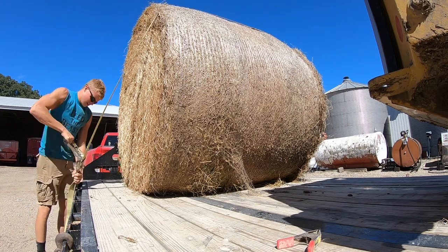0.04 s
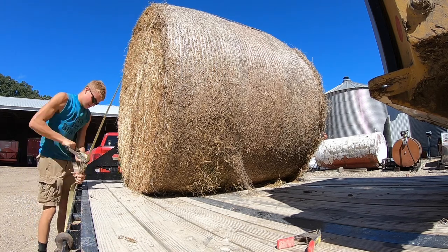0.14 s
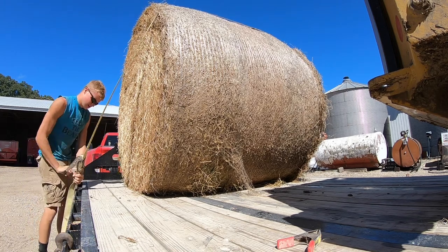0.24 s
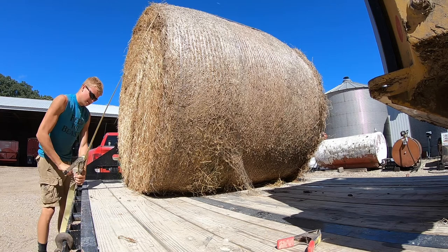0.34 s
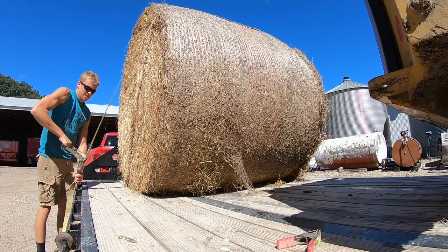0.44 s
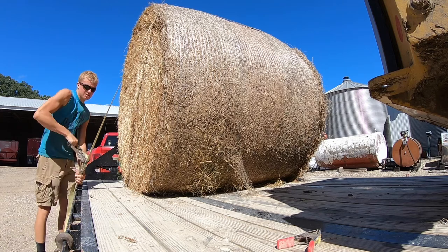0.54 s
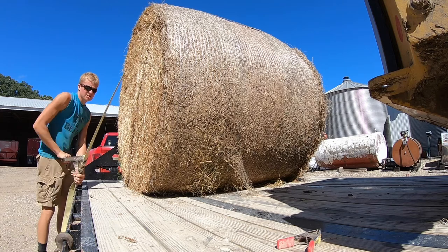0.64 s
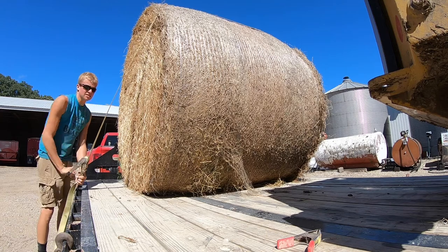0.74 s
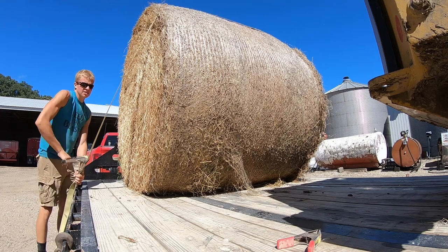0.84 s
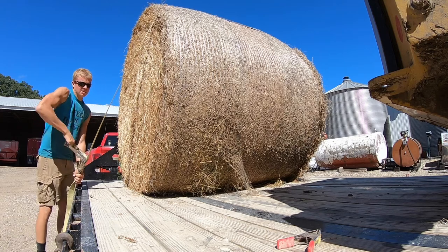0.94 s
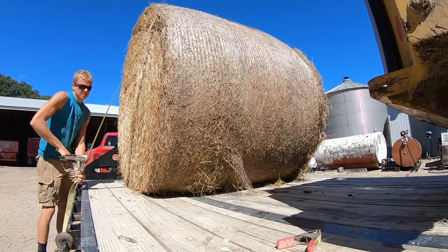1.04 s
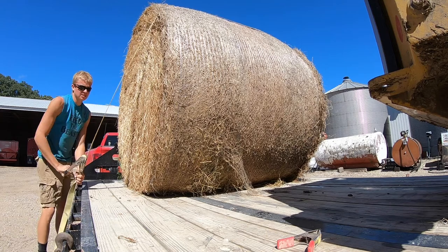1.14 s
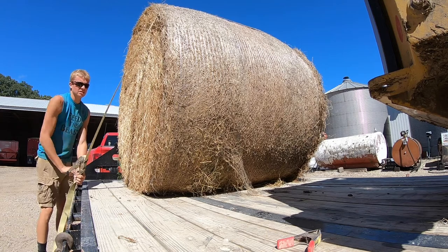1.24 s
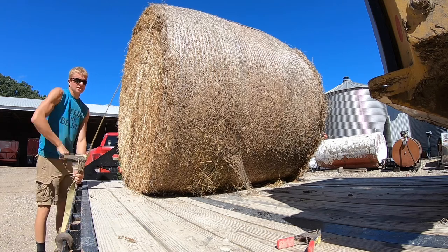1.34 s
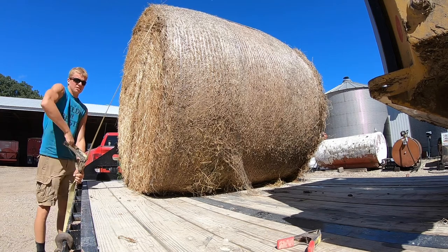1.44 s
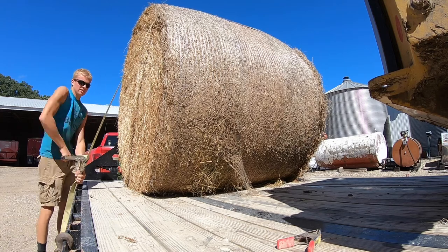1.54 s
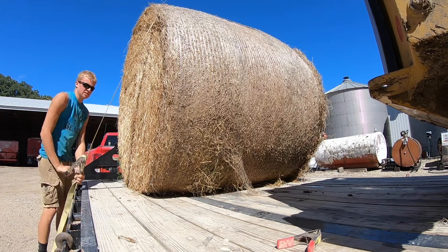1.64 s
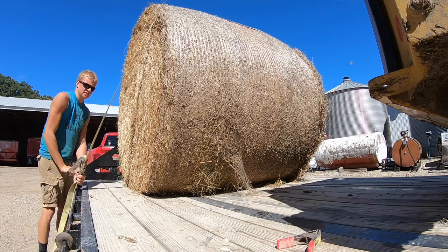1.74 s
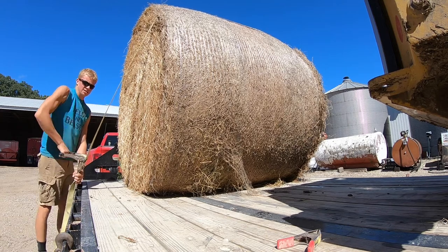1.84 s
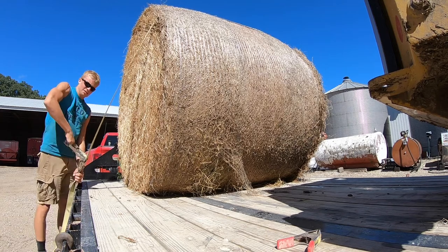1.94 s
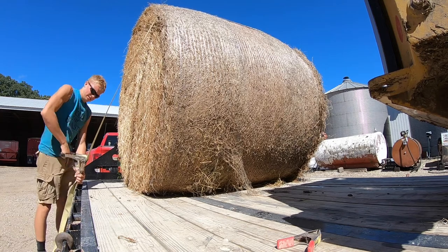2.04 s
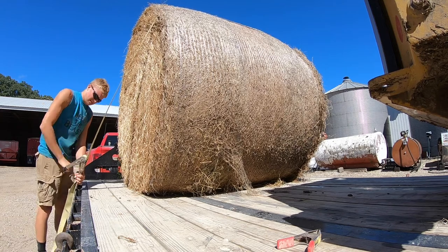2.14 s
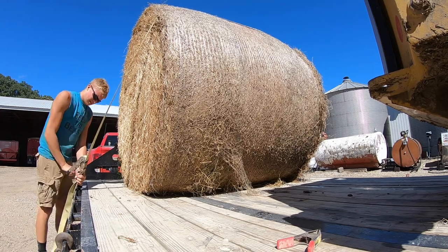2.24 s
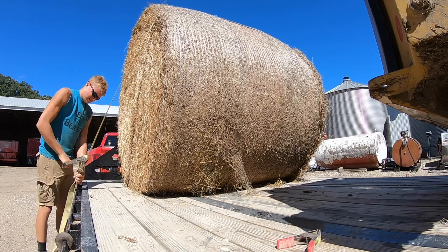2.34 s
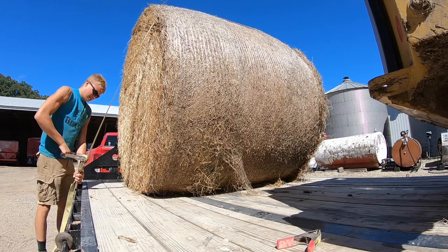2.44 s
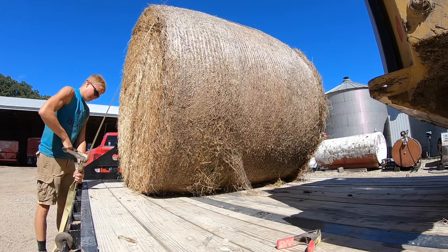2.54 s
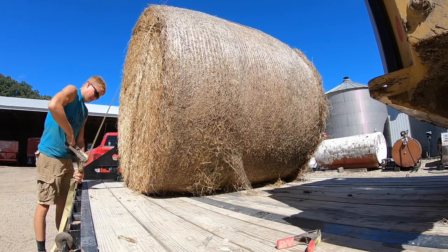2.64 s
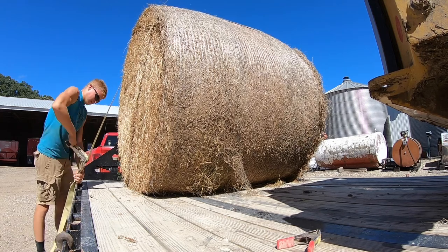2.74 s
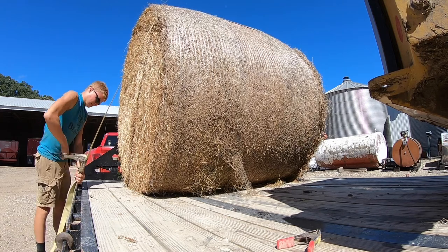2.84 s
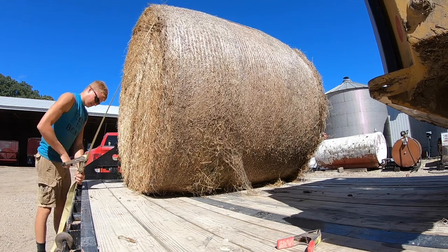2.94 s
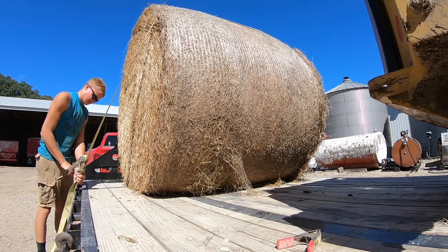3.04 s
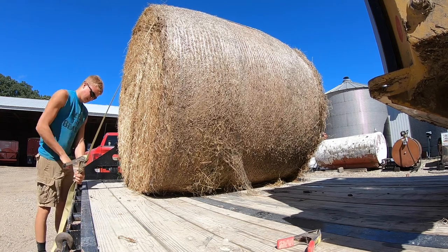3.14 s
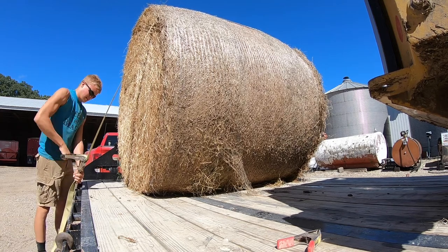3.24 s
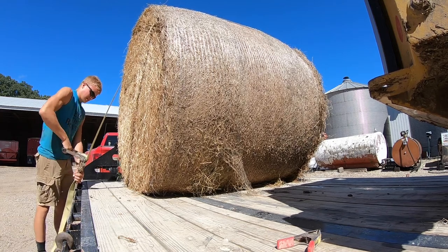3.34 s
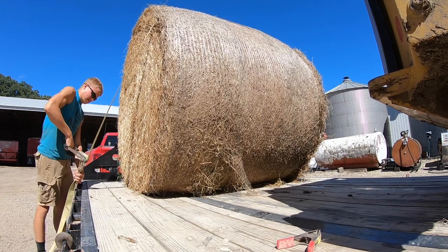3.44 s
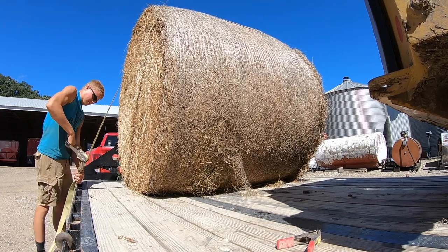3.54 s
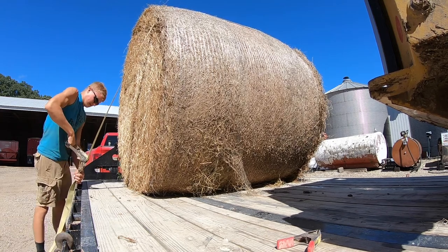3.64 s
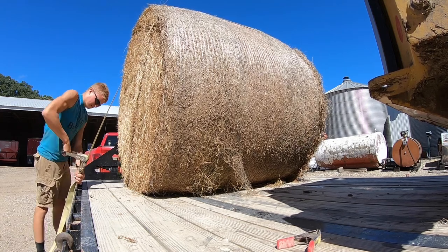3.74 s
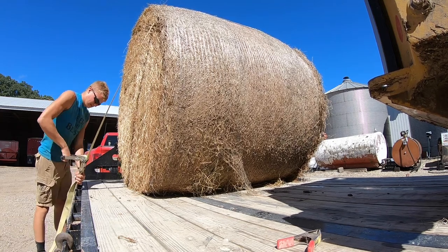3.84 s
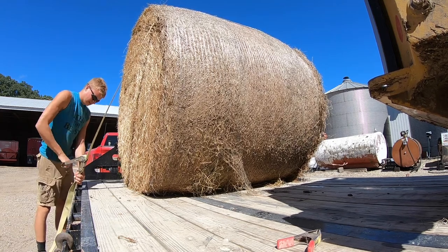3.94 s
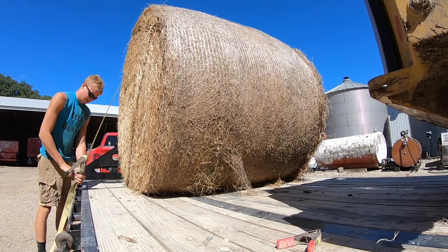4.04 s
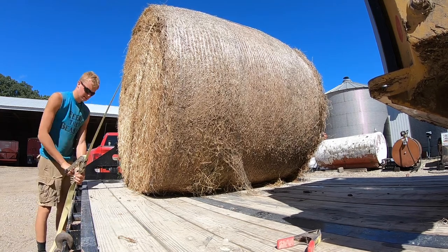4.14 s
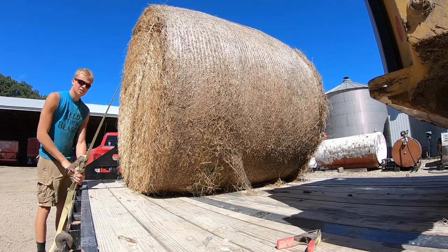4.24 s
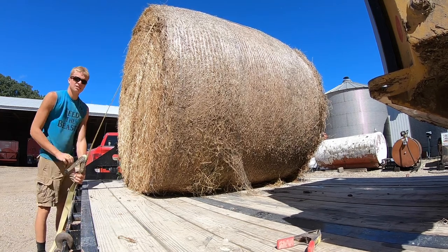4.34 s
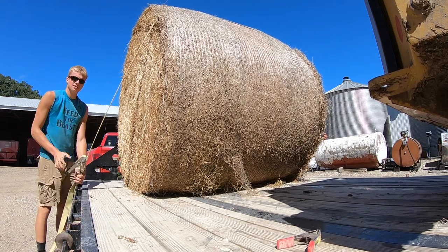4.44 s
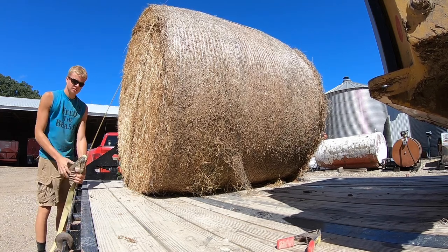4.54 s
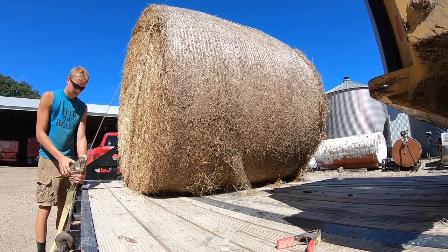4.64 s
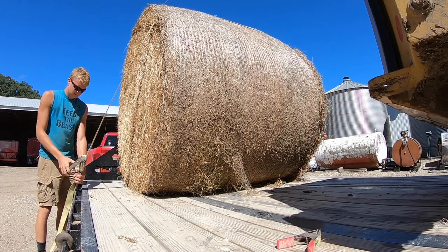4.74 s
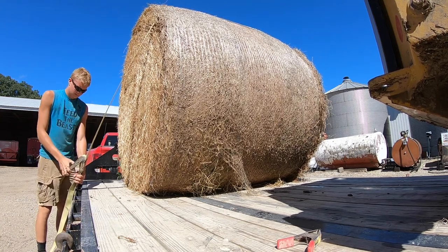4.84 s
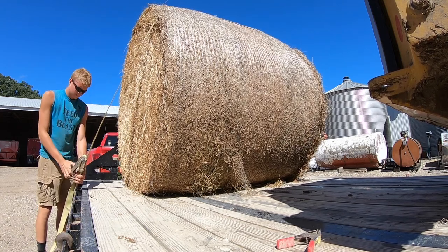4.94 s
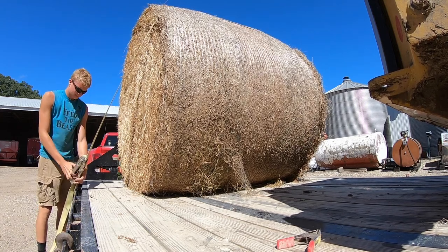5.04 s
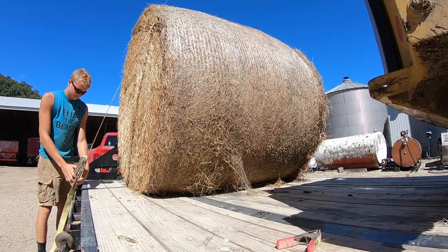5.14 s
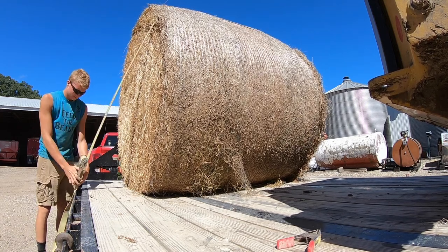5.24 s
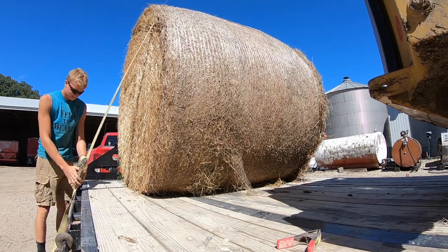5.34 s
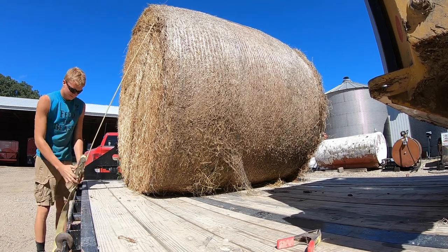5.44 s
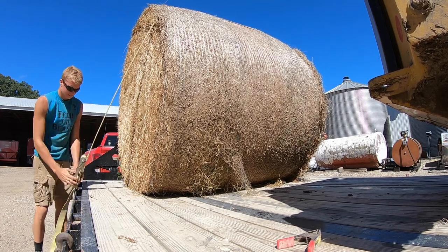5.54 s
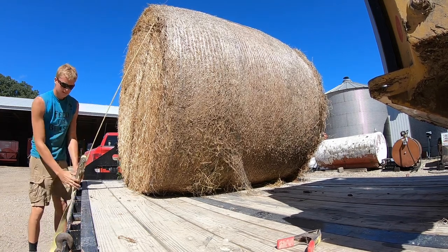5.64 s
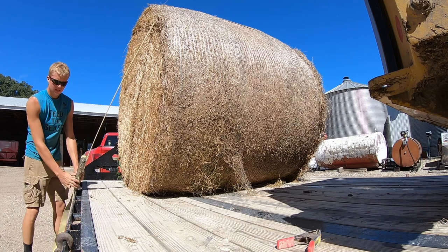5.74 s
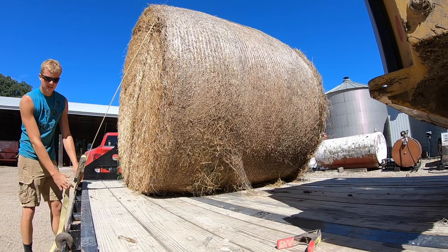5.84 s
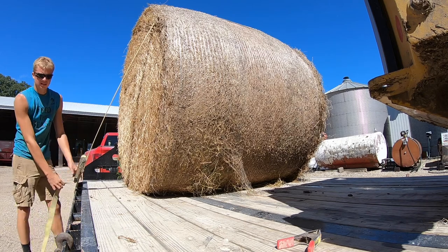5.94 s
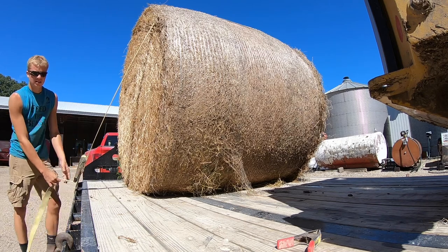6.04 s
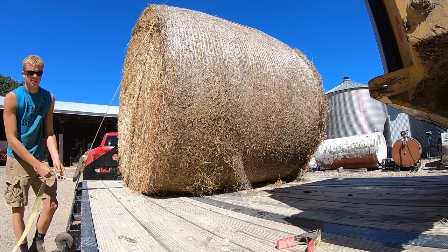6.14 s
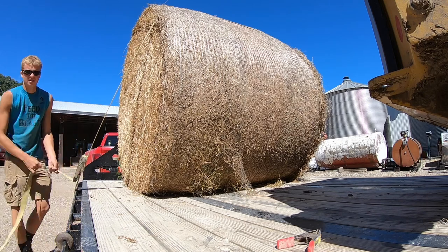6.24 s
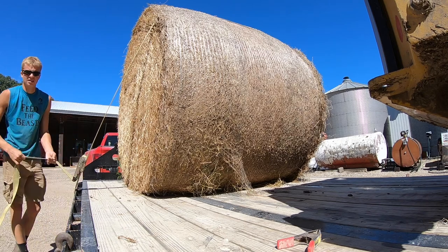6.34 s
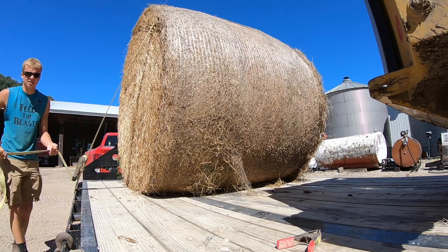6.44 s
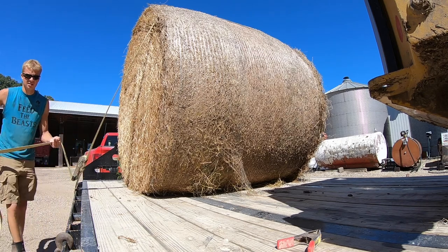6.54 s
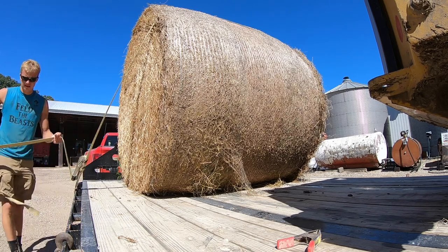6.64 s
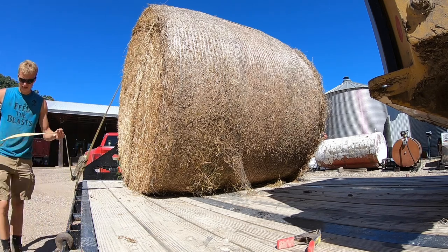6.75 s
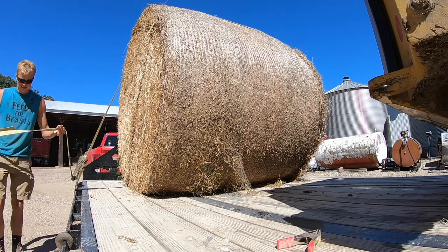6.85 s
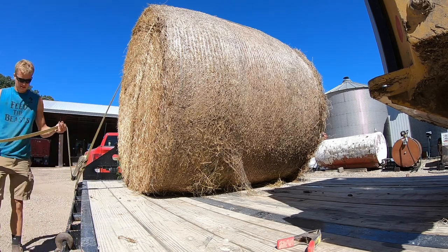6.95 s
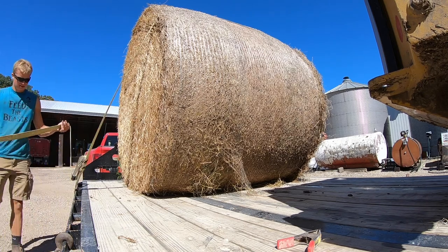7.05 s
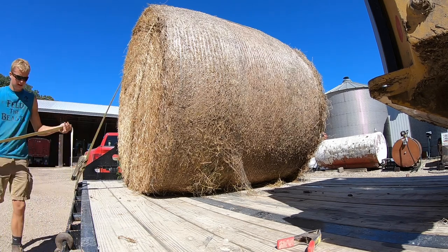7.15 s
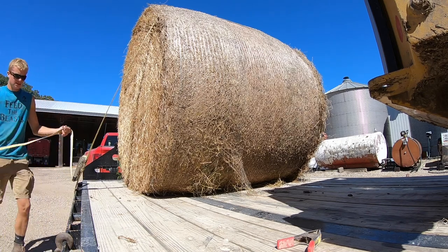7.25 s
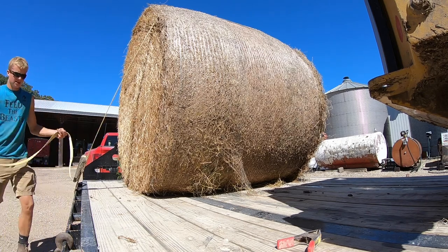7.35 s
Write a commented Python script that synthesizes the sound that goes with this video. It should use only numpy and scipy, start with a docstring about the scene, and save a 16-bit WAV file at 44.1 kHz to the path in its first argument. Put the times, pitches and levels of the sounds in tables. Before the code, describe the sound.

Rapid metallic pawl clatter and dull plank thumps, heard close through a trailer deck, thin out into a last knock and soft strap flaps.

```python
"""On a wooden trailer deck that also carries the microphone, a ratchet strap is cranked tight.
The pawl rattles over steel teeth: noise bursts, and resonances of frame, handle and pawl struck by blows.
Each pull jolts the planks, modelled as resonators; the deck groans (excited by noise) and rumbles.
At the end the loose webbing snaps and rustles: shaped noise without resonance."""
import sys
import numpy as np
from scipy import signal
from scipy.fft import rfft, irfft, next_fast_len
from scipy.io import wavfile
from scipy.ndimage import uniform_filter1d, minimum_filter1d, map_coordinates

SR = 44100
rng = np.random.default_rng(int(sys.argv[2]) if len(sys.argv) > 2 else 0)


def master(y):
    """Save y as 16-bit WAV."""
    cut = np.clip(np.atleast_2d(y).T, -1, 1)
    pcm = np.round(cut * 32767)  # scale
    wavfile.write(sys.argv[1], SR, pcm.astype(np.int16))


N = 326781

# Event and part levels are relative: each source adds its own offset in dB.
# pawl and handle contacts: [t/s, level/dB, frame ring re contact/dB, handle ring/dB, treble/dB]
CONTACTS = [(0.0214, -25.5, -1.5, -11, -18), (0.0534, -52.5, -9.5, -16, -30),
            (0.1134, -43.5, -4, -14.5, -24), (0.1585, -25.5, -8, -20.5, -17.5),
            (0.2039, -25, -15, -19, -17.5), (0.3277, -45.5, -18.5, -19.5, -24.5),
            (0.3456, -33, -2.5, -20.5, -29.5), (0.3641, -31.5, 0, -12.5, -30.5),
            (0.404, -17.5, -1, -10.5, -19.5), (0.4459, -26, -1.5, -8, -20),
            (0.4684, -33, -6.5, -12.5, -28.5), (0.5462, -40.5, 0, -16.5, -24.5),
            (0.5594, -44.5, -15.5, -13.5, -21), (0.613, -25.5, -10.5, -14, -14.5),
            (0.6669, -27, -8, -14, -21), (0.7951, -33.5, -4.5, -17.5, -30),
            (0.8204, -37.5, 1.5, -15.5, -23), (0.8694, -22.5, -8.5, -7, -20.5),
            (0.9184, -43, -15.5, -3.5, -24.5), (0.9632, -37.5, -14, -4.5, -26.5),
            (0.9872, -33, -0.5, -11, -26), (1.0051, -33, -4.5, -24.5, -30.5),
            (1.0331, -39, -12, -20.5, -23), (1.1124, -24.5, -18, -21, -22.5), (1.2645, -42, -7, -9, -28),
            (1.277, -32, -7, -19.5, -31.5), (1.3044, -35, 2, -9, -30), (1.3478, -23.5, -5, -7.5, -17.5),
            (1.3794, -40, -11.5, -11.5, -32), (1.4586, -27.5, -12, -10, -25),
            (1.496, -31.5, -12, -19.5, -20.5), (1.5234, -39, -14.5, -16, -20.5),
            (1.6043, -26, -8, -22.5, -20.5), (1.6374, -37, -18.5, -23, -27.5),
            (1.7489, -38, -3.5, -7, -38.5), (1.7744, -33.5, -2.5, -22.5, -31.5),
            (1.7984, -37, 0.5, -18.5, -27), (1.8427, -25, -7, -2, -19), (1.9031, -40, -20, -3, -26),
            (1.9689, -32, -8.5, -8.5, -24), (2.0078, -40, -11, -19.5, -22.5),
            (2.0413, -41, -15.5, -12.5, -22), (2.1286, -21.5, -2, -18, -22.5), (2.1604, -32, -14, -16, -41),
            (2.2762, -42, -2.5, -7, -33), (2.3052, -36.5, -7.5, -13, -38), (2.3426, -39, -4, -15.5, -32.5),
            (2.4423, -38, -19.5, -4, -23), (2.4813, -28, -14.5, -12, -27),
            (2.5037, -30.5, -5.5, -13, -23.5), (2.7467, -35, -16.5, -5.5, -27.5),
            (2.797, -26, -11, -12, -36), (2.8489, -37.5, -13.5, -17.5, -36),
            (2.9013, -40, -5, -27.5, -42.5), (2.9587, -21.5, -3.5, -8, -28.5),
            (2.9864, -34, -13, -23.5, -34), (3.1123, -37.5, -9.5, -15, -27.5),
            (3.1433, -49.5, 0, -15.5, -20), (3.1647, -42.5, -1.5, -17.5, -34.5),
            (3.1984, -45.5, -2, -13.5, -35), (3.261, -33.5, -9.5, -5.5, -29),
            (3.2899, -28.5, -18.5, -12, -21.5), (3.3124, -30, -5, -2, -31), (3.3887, -38.5, -1.5, -11, -36),
            (3.5294, -54, -8.5, -8, -37), (3.6381, -46.5, -16, -10, -30),
            (3.6611, -29.5, -12.5, -10, -33.5), (3.707, -35.5, -4, -7.5, -32.5),
            (3.7628, -44.5, -3.5, -13, -28.5), (3.8003, -35, -8.5, -29, -42),
            (3.9439, -43.5, -14.5, -9.5, -33), (3.9724, -22.5, -9.5, -17.5, -26),
            (4.2393, -36, -3, -22.5, -47.5), (4.2717, -34.5, -18, -22.5, -44),
            (4.3231, -35.5, -12, -20.5, -36), (4.362, -35.5, -12, -21, -45),
            (4.5221, -51, -16.5, -9.5, -29.5), (5.3368, -28.5, -12.5, -19.5, -33.5),
            (5.4904, -41.5, -17, -17, -66.5), (5.6186, -44.5, -7.5, -15, -27),
            (5.6645, -28.5, -6, -20.5, -26.5), (5.7498, -47.5, -9, -19, -29),
            (6.1265, -38.5, -8, -10, -37.5)]
# small steel parts singing out: [t/s, level/dB, f/Hz, decay time t60/s]
PING_EVENTS = [(.21, -45.5, 4360, 0.1), (0.666, -28.5, 5650, 0.032), (1.461, -36.5, 3860, 0.083),
               (1.862, -38, 3000, 0.079), (1.899, -48.5, 2820, 0.34), (2.44, -40.5, 3027, 0.094),
               (2.484, -27.5, 4370, 0.017), (2.957, -30.5, 4510, 0.062), (4.527, -51, 2290, 0.052)]
# resonances of the ratchet's steel parts: [f/Hz, bandwidth/Hz, level/dB]
FRAME_MODES = [(1391, 50, -6.5), (1810, 17, -13), (2000, 35, -2), (2095.4, 18, 7), (2306, 20, -12.5)]
HANDLE_MODES = [(2700, 18, 13.5), (2956, 25, 17), (3310, 64, 10.5)]
PAWL_MODES = [(3880, 160, 6), (4170, 84, 7.5), (4470, 86, 10), (4980, 76, 7), (5240, 17, -11.5),
              (5680, 50, -23)]
# noise spectrum of the rattling steel: [f/Hz, level per Hz/dB]
RATTLE_SPECTRUM = [(500, -20), (850, -2.5), (1400, -14), (2100, -4.5), (3000, -11), (4500, -12.5),
                   (5700, -16), (6200, -24), (8200, -34.5), (8900, -53.5), (11000, -49.5), (14000, -61),
                   (15700, -73.5)]
# jolts into the deck: [t/s, level/dB, beam re jolt/dB, short planks re jolt/dB]
JOLT_EVENTS = [(0.027, -22.5, -4.5, -11), (0.158, -32, -8.5, -7), (0.209, -24.5, -14, -13),
               (0.35, -30, 9.5, -9.5), (0.407, -19, -8.5, -9), (0.548, -35, -12.5, -10.5),
               (0.614, -30.5, -19.5, -3.5), (0.671, -24, -12.5, -12), (0.796, -17.5, -1.5, -20.5),
               (0.87, -19.5, -16, -8.5), (1.011, -28.5, -17.5, -9.5), (1.086, -38, -9, -11.5),
               (1.137, -21.5, -4.5, -17.5), (1.278, -21.5, 0, -12.5), (1.349, -15.5, -12, -19),
               (1.425, -22.5, -1.5, -37.5), (1.497, -24.5, -11, -15.5), (1.604, -27, -13.5, -7.5),
               (1.636, -19, -7.5, -15), (1.774, -18, -3.5, -14.5), (1.844, -20, -14, -25),
               (2.014, -27, -22.5, -11.5), (2.133, -27, -17.5, -2.5), (2.31, -28, -15.5, -16.5),
               (2.451, -35, -17.5, -8.5), (2.484, -25, -22.5, -17.5), (2.508, -22, -22.5, -19.5),
               (2.744, -36, -16.5, -7.5), (2.804, -26, -13, -21.5), (2.906, -37, -15, -15.5),
               (2.956, -31.5, -28, 3), (2.987, -16.5, -20.5, -23.5), (3.12, -21, -9, -21),
               (3.304, -26, -9, -10.5), (3.323, -26.5, -18.5, -11), (3.394, -31.5, -25.5, -11),
               (3.536, -28.5, -17.5, -23.5), (3.66, -34.5, -30, -8), (3.713, -33, -12.5, -8.5),
               (3.803, -33, -13, -14.5), (3.973, -23.5, -14, -10), (4.222, -42, -19, 0),
               (4.241, -24, -14.5, -20), (4.272, -24.5, -11, -20.5), (4.327, -34.5, -21, -10),
               (4.367, -29.5, -20, -13.5), (4.73, -50, -12.5, -0.5), (4.95, -34.5, -6.5, -9),
               (5.172, -40, -2, -16), (5.249, -48, -9.5, -4), (5.335, -30.5, -4, -5), (5.399, -36, -9, -7),
               (5.444, -42.5, -18.5, 1), (5.491, -41.5, -14, -1.5), (5.62, -31, -19, -10.5),
               (5.666, -15.5, -7, -19.5), (5.738, -34, -11.5, -34), (6.133, -26, -4.5, -11),
               (6.243, -41.5, 1.5, -27.5)]
# resonances of long planks, short planks and beam: [f/Hz, bandwidth/Hz, level/dB]
LONG_PLANK_MODES = [(332.9, 19.6, 0), (391.4, 16.8, 0.5), (420.3, 15.4, -6.5)]
SHORT_PLANK_MODES = [(501.1, 10.6, 11), (542, 48, -13), (554, 15, -11), (595, 540, -18.5),
                     (682.3, 9.8, -3.5), (751, 16, -8.5), (816, 110, -23), (904, 15, -8.5),
                     (1070, 5.3, -7.5)]
BEAM_MODES = [(156.3, 18.5, -2), (242.4, 18, -6), (288.7, 18, -8.5)]
# noise spectra of a jolt's dull part and of the bed's rumble: [f/Hz, level per Hz/dB]
THUD_SPECTRUM = [(120, -12), (250, -6), (450, 10.5), (650, -12.5), (900, -8), (1500, -29), (4000, -120)]
RUMBLE_SPECTRUM = [(12, -3), (20, -3), (54, 5), (102, -7.5), (140, -9.5), (180, -56), (310, -120)]
# groan of the deck between jolts, and rumble of the bed: [t/s, level/dB]
GROAN_LEVEL = [(0.0, -37.5), (0.31, -50.5), (0.89, -37), (1.22, -48.5), (1.46, -41), (2.43, -44),
               (2.56, -54.5), (2.77, -51), (2.99, -42.5), (3.55, -59), (3.84, -51), (4.66, -58),
               (5.08, -48.5), (5.61, -51.5), (5.96, -60.5), (6.91, -61), (7.06, -75.5), (7.41, -61)]
RUMBLE_LEVEL = [(0.0, -50), (0.06, -41), (0.29, -47), (0.41, -35.5), (0.62, -38), (0.8, -34.5),
                (1.01, -41.5), (1.09, -29.5), (1.15, -42.5), (2.56, -38), (3.16, -41.5), (3.24, -45.5),
                (3.61, -43.5), (3.65, -48), (3.88, -38.5), (4.58, -57.5), (4.72, -38.5), (6.48, -59),
                (6.58, -49.5), (7.1, -67.5), (7.14, -50), (7.41, -59)]
# snaps of loose webbing: [t/s, level/dB, treble/dB, decay time t60/s]
SNAP_EVENTS = [(4.627, -53.5, -53.5, 0.15), (4.67, -48.5, -59, 0.095), (4.717, -54.5, -26.5, 0.13),
               (4.742, -51.5, -18, 0.06), (5.372, -43.5, -30, 0.071), (5.407, -43.5, -39, 0.069),
               (5.449, -50, -40, 0.051), (5.504, -47, -37, 0.025), (5.558, -44, -32, 0.04),
               (5.592, -56.5, -22, 0.053), (5.775, -57, -32.5, 0.06), (5.9, -44, -43, 0.044),
               (5.924, -44.5, -48.5, 0.14), (5.958, -49, -37, 0.036), (6.02, -54, -36, 0.06),
               (6.197, -52, -15.5, 0.12), (6.247, -41.5, -17.5, 0.05), (6.264, -46.5, -18, 0.18),
               (6.438, -53, -18, 0.11), (6.652, -49, -16, 0.06), (6.684, -48, -32, 0.043),
               (6.702, -39.5, -16.5, 0.051), (6.752, -52.5, -39.5, 0.078), (7.017, -43, -12.5, 0.068),
               (7.237, -54, -17.5, 0.09), (7.283, -50, -14, 0.035), (7.293, -46, -13.5, 0.095),
               (7.332, -40.5, -14.5, 0.067), (7.367, -48.5, -15, 0.11)]
# webbing drawn along: [middle t/s, level/dB, length/s]
SWISH_EVENTS = [(4.939, -66, 0.083), (5.414, -59.5, 0.073), (5.975, -66, 0.08), (6.317, -72.5, 0.22),
                (6.73, -64, 0.13), (7.32, -58.5, 0.097)]
# scrape of the strap between contacts: [t/s, level/dB]
SCRAPE_LEVEL = [(0.0, -44), (0.16, -64.5), (2.37, -60), (2.52, -59.5), (3.01, -68), (3.63, -69.5),
                (3.86, -61), (3.98, -72.5), (4.37, -71.5), (5.36, -69.5), (5.53, -59.5), (5.7, -61),
                (7.26, -69.5), (7.41, -61.5)]
# noise spectra of the snapping and the scraping webbing: [f/Hz, level per Hz/dB]
RUSTLE_SPECTRUM = [(150, -25.5), (290, 12), (500, 7.5), (729, -0.5), (1200, -5), (1440, 1.5), (1700, 3.5),
                   (3060, 4.5), (6100, -21.5), (7930, -37.5), (13400, -120)]
SCRAPE_SPECTRUM = [(350, -16), (600, -7.5), (780, 15.5), (947, 5.5), (1290, 13.5), (2140, 9.5), (3250, 2.5),
                   (4300, -1), (5220, -8), (6100, -20.5), (7930, -27.5), (13400, -120)]
# noise spectrum of the background air: [f/Hz, level per Hz/dB]
AIR_SPECTRUM = [(15, -2), (25, -4), (91, 4.5), (154, 15.5), (238, 9), (533, -14.5), (788, -24.5),
                (1300, -33.5), (2000, -24.5), (3130, -15.5), (4420, -18.5), (6100, -42.5), (7930, -67.5),
                (13400, -120)]
# stereo width: [f/Hz, side minus mid/dB]
SIDE_LEVEL = [(60, -59), (500, -68.5), (1500, -56), (4000, -39.5), (8000, -23), (13000, -5)]

PAWL_RING_DB, PAWL_SCATTER_DB = 7, 4  # over the contact; differs by chance from tooth to tooth
RATTLE_T60_S = 0.059
CRACK_DB, CRACK_T60_S = -4, 0.012  # the first sharp touch of each contact
PUSH_T60_S = 0.05  # decay of the noise that excites planks and beam
THUD_DB, THUD_T60_S = 6.5, 0.037  # over the short planks' share
AFTER_DB, AFTER_T60_S = -19.5, 0.34  # the deck keeps groaning after each jolt
GRIND_DB, GRIND_T60_S = -14.5, 0.14  # the strap winds on the spool after each contact
AIR_DB = -57
CEILING, HOLD_S = 0.15, 0.006  # the limiter's top amplitude and hold
HISS_DB, TOP_HZ = -100, 15700


def ratchet():
    """Impact and friction: blows and sliding steel excite the resonances, contacts rattle briefly."""
    times, db, frame_db, handle_db, treble_db = np.transpose(CONTACTS)
    t60 = np.full(len(times), RATTLE_T60_S)
    pawl_db = PAWL_RING_DB + PAWL_SCATTER_DB * rng.standard_normal(len(times))
    # steel slides only while the handle works
    sliding = bursts(times, db, 3 * t60, rise=0.014, creep=0.0047)
    parts = ((FRAME_MODES, frame_db + 29, -10),
             (HANDLE_MODES, handle_db + 15, -12),
             (PAWL_MODES, pawl_db, -14))
    ring = 0
    for modes, ring_db, slide_db in parts:
        push = bursts(times, db + ring_db, 0.56 * t60, rise=0.005, creep=0.0045)
        friction = rng.standard_normal(N) * (push + amp(slide_db) * sliding)
        blows = strikes(times + 0.002006, db + ring_db + 13.5)
        ring = ring + ringing(friction + blows, modes)
    # the deck path dulls the steel
    ring = filtered(ring, lambda hz: 1 / (1 + 1j * hz / 6000) ** 6)
    ring = wavering(ring, share=0.008, rate=60)
    # loose parts touch and choke the ringing unevenly
    flutter = amp(3 * wobble(130))
    rattle = with_treble(times, db - 7, treble_db, t60, RATTLE_SPECTRUM, rise=0.0016, creep=0.006)
    crack_t60 = np.full(len(times), CRACK_T60_S)
    crack = with_treble(times, db + CRACK_DB, treble_db, crack_t60, RATTLE_SPECTRUM,
                        rise=0.0004, creep=0.001)
    return (ring + pings()) * flutter + rattle + crack


def pings():
    """Free vibration: a decaying sinusoid for each small part, its phase wandering at random."""
    out, t = np.zeros(N + SR), np.arange(SR // 2) / SR
    for start, db, hz, t60 in PING_EVENTS:
        phase_walk = np.cumsum(rng.standard_normal(len(t))) * 0.038
        envelope = amp(db - 60 * t / t60) * (1 - np.exp(-t / 0.0018))
        out[round(start * SR):][:len(t)] += envelope * np.sin(2 * np.pi * hz * t + phase_walk)
    return out[:N]


def deck():
    """Structure-borne sound: jolts and strain excite plank and beam modes, over a rocking bed."""
    wood = filtered(knocks() + groan(), lambda hz: 1 / (1 + 1j * hz / 1800) ** 3)  # wood swallows treble
    return wood + rumble()


def knocks():
    """Impulse response: each jolt excites damped modes of the wood and adds a dull thud."""
    times, db, beam_db, short_db = np.transpose(JOLT_EVENTS)
    each = np.ones(len(times))
    parts = ((LONG_PLANK_MODES, 18), (SHORT_PLANK_MODES, short_db + 24), (BEAM_MODES, beam_db + 22.5))
    ring = 0
    for modes, part_db in parts:
        envelope = bursts(times, db + part_db, PUSH_T60_S * each, rise=0.006, creep=0.006)
        push = rng.standard_normal(N) * envelope
        blows = strikes(times + 0.003007, db + part_db + 27)
        ring = ring + ringing(push + blows, modes)
    # loose boards choke the ringing unevenly
    ring = wavering(ring, share=0.011, rate=30) * amp(2 * wobble(70))
    thud = bursts(times, db + short_db + THUD_DB, THUD_T60_S * each, rise=0.003, creep=0.005)
    return ring + coloured(THUD_SPECTRUM) * thud


def groan():
    """Slip under load: unevenly modulated noise excites the wood's resonances."""
    slips = rng.standard_normal(N) * amp(1.75 * wobble(25))
    long_part = ringing(slips, LONG_PLANK_MODES)
    short_part = amp(-11) * ringing(slips, SHORT_PLANK_MODES)
    beam_part = amp(6.5) * ringing(slips, BEAM_MODES)
    times, db = np.transpose(JOLT_EVENTS)[:2]
    after = bursts(times, db + AFTER_DB, np.full(len(times), AFTER_T60_S), rise=0.0082, creep=0.021)
    load = amp(curve(GROAN_LEVEL)) + after
    return load * unit(long_part + short_part + beam_part)


def rumble():
    """Low-frequency rocking: coloured noise with two rates of random modulation."""
    swell = amp(2.7 * wobble(26) + 2.9 * wobble(9))
    return amp(curve(RUMBLE_LEVEL)) * unit(coloured(RUMBLE_SPECTRUM) * swell)


def webbing():
    """Heavily damped textile: snaps and swishes without ringing; friction gives uneven grains."""
    times, db, treble_db, t60 = np.transpose(SNAP_EVENTS)
    snaps = with_treble(times, db, treble_db, t60, RUSTLE_SPECTRUM, rise=0.0015, creep=0.006)
    graininess = amp(1.6 * wobble(60) + 2.2 * wobble(300))
    grains = unit(patchy(coloured(SCRAPE_SPECTRUM), depth_db=3) * graininess)
    t = np.arange(N) / SR
    swish = sum(amp(level) * np.exp(-(2 * (t - middle) / length) ** 2)
                for middle, level, length in SWISH_EVENTS)
    times, db = np.transpose(CONTACTS)[:2]
    grind = bursts(times, db + GRIND_DB, np.full(len(times), GRIND_T60_S), rise=0.016, creep=0.009)
    return snaps + (amp(curve(SCRAPE_LEVEL)) + swish + grind) * grains


def air():
    """Stationary background: faint coloured noise with random patches of gain."""
    return amp(AIR_DB) * patchy(coloured(AIR_SPECTRUM), depth_db=3)


def bursts(times, levels_db, t60s, rise, creep):
    """Contact envelope: a drag growing with time constant creep/s, a rise (also in s), a decay."""
    half = SR // 5
    env, t = np.zeros(N + SR), np.arange(-half, half) / SR
    after = np.maximum(t, 0)
    drag = 0.13 * np.exp(np.minimum(t, 0) / creep) * np.exp(-after / rise)
    onset = np.maximum(drag, 1 - np.exp(-after / rise))
    for start, db, t60 in zip(times, levels_db, t60s):
        decay = amp(db - 60 * after / np.clip(t60, 0.008, 0.4))
        env[round(start * SR):][:len(t)] += onset * decay
    # the onset leads the stated time by one rise constant
    return env[half + round(rise * SR):][:N]


def with_treble(times, db, treble_db, t60, spectrum, rise, creep):
    """Contact noise: body and treble have separate burst levels, split around 4700 Hz."""
    def body_share(hz):
        return 1 / (1 + (hz / 4700) ** 6)

    # a chatter of tiny rebounds
    noise = patchy(coloured(spectrum), depth_db=4.5) * amp(1.6 * wobble(400))
    body = noise * bursts(times, db, t60, rise, creep)
    top = noise * bursts(times, db + treble_db + 24, 1.01 * t60, rise, creep)
    return filtered(body, body_share) + filtered(top, lambda hz: 1 - body_share(hz))


def strikes(times, levels_db):
    """Ideal impulse: one single-sample blow per event, of random sign."""
    x = np.zeros(N)
    x[np.round(times * SR).astype(int)] = amp(levels_db) * rng.choice([-1, 1], len(times))
    return x


def ringing(x, modes):
    """Modal superposition: parallel causal resonances, alternating in sign."""
    def response(f):
        total = 0
        for k, (centre, width, db) in enumerate(modes):
            damping = 1j * f * width
            total = total + (-1) ** k * amp(db) * damping / (centre ** 2 - f ** 2 + damping)
        return total

    return filtered(x, response)


def wavering(x, share, rate):
    """Varying delay: pitch drifts by about this share as the load on the part shifts."""
    delay = share * SR / rate * wobble(rate)
    return map_coordinates(x, [np.arange(N) + delay], mode="nearest")


def patchy(x, depth_db):
    """Spectral fluctuation: smoothed random gains over time and frequency."""
    z = signal.stft(x, nperseg=256)[2]
    field = uniform_filter1d(rng.standard_normal(z.shape), size=5, axis=0)
    field = uniform_filter1d(field, size=12, axis=1)
    return unit(signal.istft(z * amp(depth_db * unit(field)), nperseg=256)[1][:N])


def coloured(spectrum):
    """Spectral shaping: steady noise of rms 1."""
    return unit(filtered(rng.standard_normal(N), lambda hz: amp(along(spectrum, hz))))


def filtered(x, response):
    """Linear filtering: the spectrum of x times a response over f/Hz, zero-padded."""
    m = next_fast_len(N + SR // 2)
    return irfft(rfft(x, m) * response(np.fft.rfftfreq(m, 1 / SR)), m)[..., :N]


def wobble(rate):
    """Band-limited chance: a smooth random curve with rate knots a second."""
    knots = rng.standard_normal(int(N * rate / SR) + 4)
    return map_coordinates(knots, [np.arange(N) * rate / SR])


def curve(rows):
    """Linear interpolation: (t/s, value) rows to one value per sample."""
    t, value = np.transpose(rows)
    return np.interp(np.arange(N) / SR, t, value)


def along(points, hz):
    """Logarithmic frequency scale: interpolates (f/Hz, value) points."""
    f, v = np.transpose(points)
    return np.interp(np.log(hz + 1), np.log(f + 1), v)


def amp(db):
    """Decibel law: level to amplitude ratio."""
    return 10 ** (np.asarray(db) / 20)


def unit(x):
    """Normalisation: scales x to rms 1."""
    return x / np.sqrt(np.mean(x ** 2) + 1e-20)


def scene():
    """Superposition of all sources, nearly mono: a faint phase-scattered copy differs by channel."""
    mid = ratchet() + deck() + webbing() + air()

    def scatter(hz):
        band = np.arange(len(hz)) // 60  # one random phase per 60 frequency bins
        return np.exp(2j * np.pi * rng.random(len(hz) // 60 + 1)[band])

    side = filtered(mid, lambda hz: amp(along(SIDE_LEVEL, hz)) * scatter(hz))
    return np.array([mid + side, mid - side])


def record(dry):
    """Gain reduction tames the hardest blows; electronic hiss is added; the band ends at TOP_HZ."""
    hold = round(HOLD_S * SR)
    need = np.minimum(1, CEILING / (np.abs(dry).max(axis=0) + 1e-9))
    gain = uniform_filter1d(minimum_filter1d(need, size=2 * hold), size=hold)
    hiss = amp(HISS_DB) * rng.standard_normal(dry.shape)
    return filtered(dry * gain + hiss, lambda hz: hz < TOP_HZ)


dry = scene()
out = record(dry)
master(out)
```